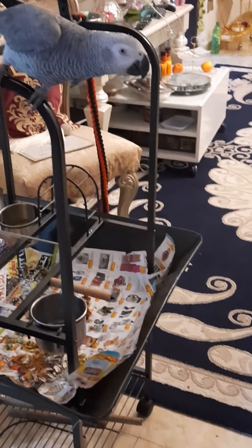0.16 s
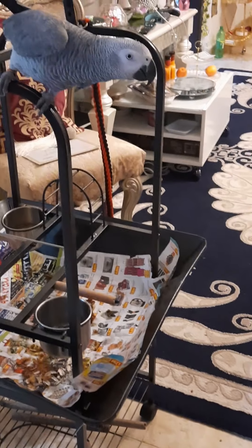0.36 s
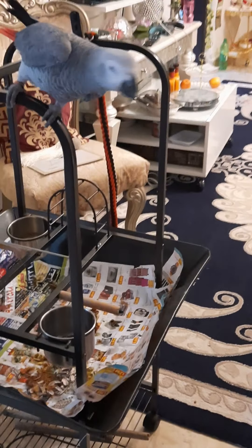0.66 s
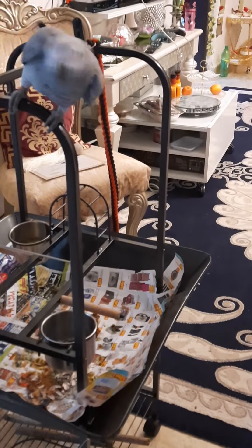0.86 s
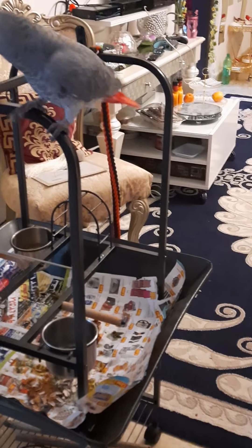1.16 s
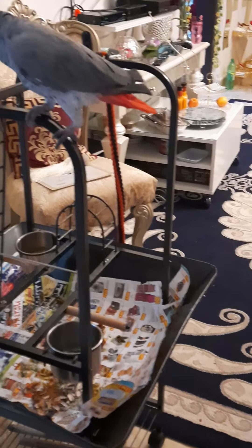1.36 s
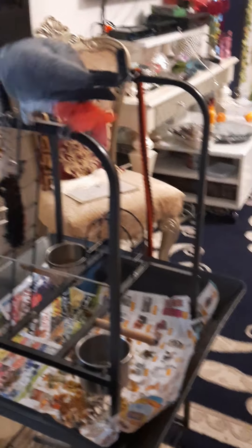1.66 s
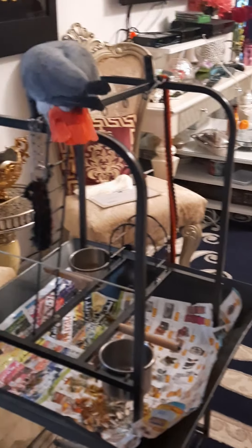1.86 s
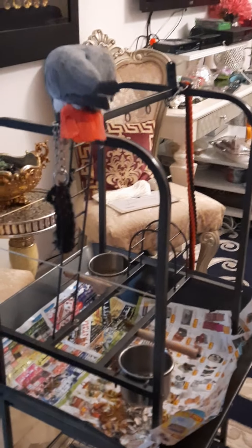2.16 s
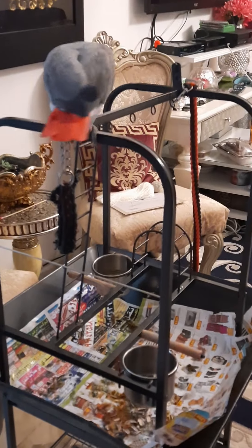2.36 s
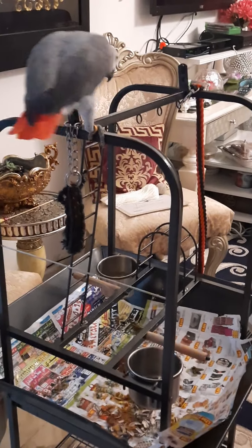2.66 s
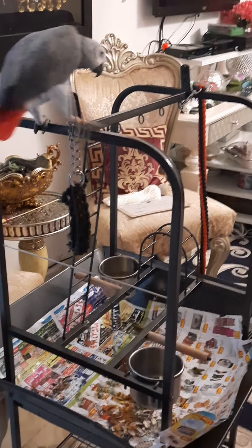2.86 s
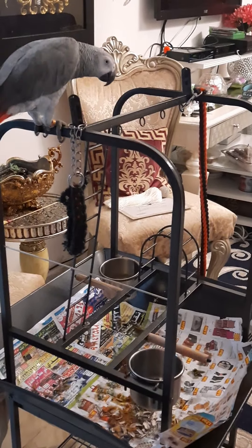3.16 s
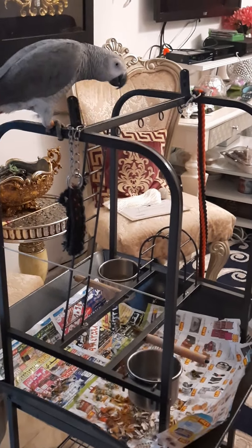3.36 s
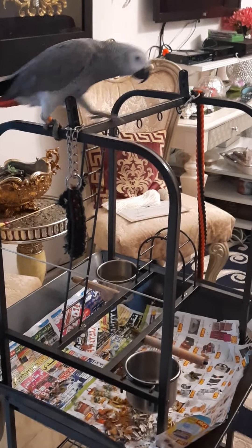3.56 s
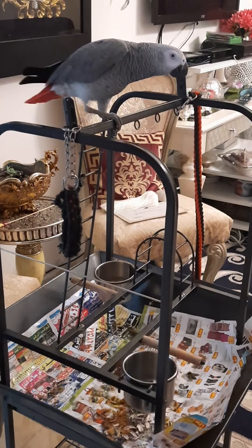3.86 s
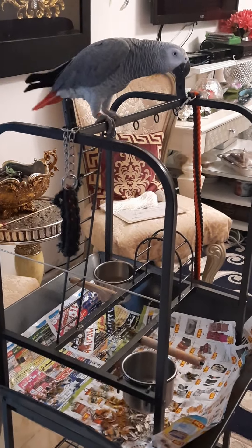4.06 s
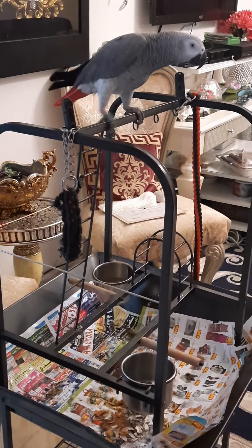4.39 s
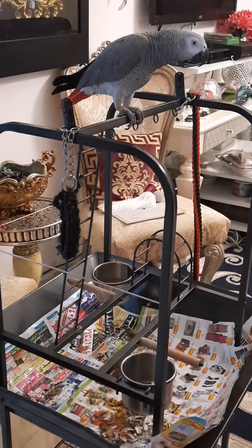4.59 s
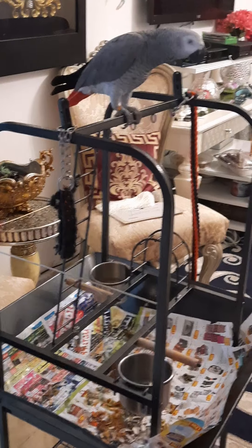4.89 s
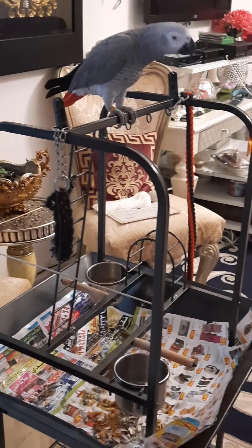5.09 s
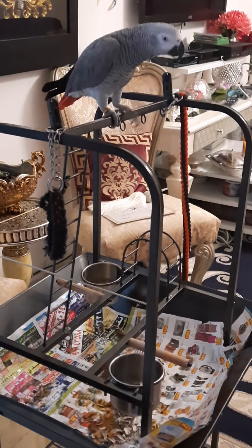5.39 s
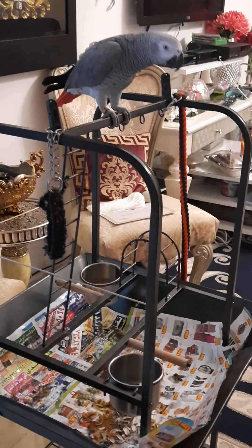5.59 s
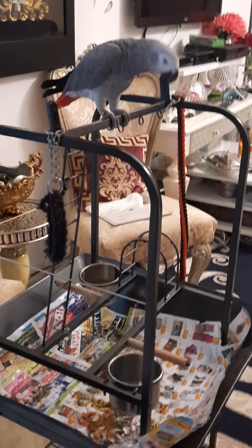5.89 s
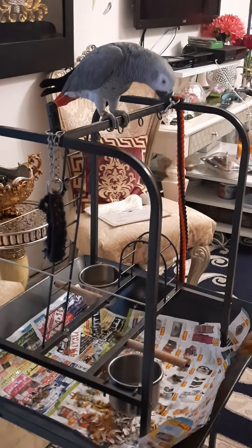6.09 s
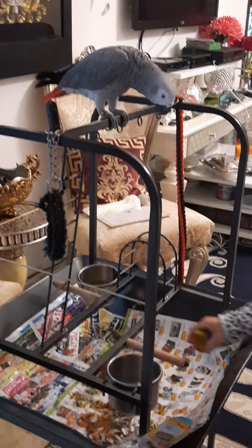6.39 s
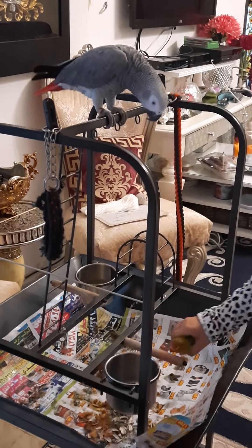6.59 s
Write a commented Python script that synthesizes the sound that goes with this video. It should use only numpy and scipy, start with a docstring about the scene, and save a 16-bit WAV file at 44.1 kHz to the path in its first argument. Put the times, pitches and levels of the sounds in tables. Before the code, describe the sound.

A quiet living room with a low, gently uneven house rumble, a very faint appliance hum and thin hiss, in stereo. Soft beak pops at about 0.4 and 0.5 s. At 0.66 s a tiny bright snap, then a clear parrot chirp to 0.81 s: a quick swoop up, a dip, then a held high whistle, raspy at first, brightening as the beak opens, with short room echo. From 1.3 s come sparse pops and light claw ticks on metal, denser from 1.65 to 2.9 s. Short foot scuffs at 2.13 and 2.93 s faintly ring the frame. At 3.38-3.45 s a much softer, brief, trilled two-voiced chirp, more roomy, with a feather rustle. A bright scuff at 3.78 s, then scattered faint clicks, ticks, tiny creaks and feather brushes until two small ticks near 6.6 s.

```python
"""Parrot on a metal play stand

A grey parrot turns round on its stand in a quiet living room. Two chirps are gliding tones with overtones
and rasp; beak pops are clicks with a sliding ring. Claw ticks are resonant noise bursts, and feet and
feathers are grainy strokes of noise; steps ring the frame as decaying sines, among tiny random creaks.
The room answers with sparse echoes, over rumble and hiss of shaped noise and a faint hum of wavering sines."""
import sys
import numpy as np
from scipy import signal
from scipy.fft import rfft, irfft, next_fast_len
from scipy.io import wavfile
from scipy.ndimage import uniform_filter1d

SR = 44100
rng = np.random.default_rng(int(sys.argv[2]) if len(sys.argv) > 2 else 0)


def unload_audio(sound):
    """Save the sound as a 16-bit wav file, at the path given as the first command line argument."""
    columns = np.transpose(np.atleast_2d(sound))
    # keep every value between -1 and 1, then stretch to whole-number steps
    steps = np.round(np.clip(columns, -1, 1) * 32767)
    wavfile.write(sys.argv[1], SR, steps.astype(np.int16))


N = 297234  # length in samples
EDGE_HZ = 15950  # upper edge of the sound's band


def amp(db):
    """Decibels to gain."""
    return 10 ** (np.asarray(db) / 20)


def unit(x):
    """Scales to unit power."""
    return x / np.sqrt(np.mean(x ** 2) + 1e-20)


def read(points, hz):
    """Reads a curve as straight lines on a log-frequency axis."""
    f, value = np.transpose(points)
    return np.interp(np.log(hz + 1), np.log(f + 1), value)


def add(mix, s, sound):
    """Mixes a sound in at time s."""
    part = mix[max(round(s * SR), 0):][:len(sound)]
    part += sound[:len(part)]


def bins(size):
    """The frequencies of a spectrum of this many samples."""
    return np.fft.rfftfreq(size, 1 / SR)


def noise(colour, size):
    """Noise of unit power with a spectrum given as (f/Hz, level/dB)."""
    spectrum = rfft(rng.standard_normal(size))
    return unit(irfft(spectrum * amp(read(colour, bins(size))), size))


def drift(rate_hz, size):
    """Smooth random movement of unit power, mostly slower than the given rate."""
    span = next_fast_len(size + 4096)
    lowpass = np.exp(-(bins(span) / rate_hz) ** 2)
    return unit(irfft(rfft(rng.standard_normal(span)) * lowpass, span))[:size]


# first chirp, a quick swoop that settles on a held note: [t/s, f/Hz, level/dB]
SWOOP_NOTE = [(.670, 1407, -45), (.675, 1412, -27), (.679, 1560, -44), (.682, 2332, -37),
              (.694, 2983, -35.5), (.701, 2177, -22), (.709, 2157, -28), (.717, 2700, -37.5),
              (.750, 2683, -29), (.790, 2671, -29.5), (.810, 2710, -51)]
# second chirp, the low voice of the syrinx, which trills: [t/s, f/Hz, level/dB]
WARBLE_LOW_VOICE = [(3.378, 2140, -62), (3.390, 2272, -46.5), (3.403, 2203, -52.5), (3.414, 2230, -38),
                    (3.427, 2195, -54), (3.435, 2140, -55)]
# second chirp, the high voice, which leaps above the low one and slides down: [t/s, f/Hz, level/dB]
WARBLE_HIGH_VOICE = [(3.382, 2840, -63), (3.415, 2648, -50.5), (3.423, 3194, -45), (3.442, 2824, -42),
                     (3.453, 2780, -51)]
# what the windpipe and beak let through of the overtones: [f/Hz, level/dB]
THROAT_FILTER = [(1300, 1), (3100, -0.5), (4000, -26), (5200, -31.5), (6100, -8), (8400, -11.5),
                 (9500, -20.5), (10800, -21), (12200, -38.5), (13800, -17), (15800, -26)]
# colour of the rasp of the open beak: [f/Hz, level/dB]
RASP_COLOUR = [(1050, -23), (1400, 2.5), (1850, -3), (2500, -2), (3200, -2.5), (3620, 9), (4150, -3),
               (4700, -8.5), (6300, -4), (9000, -11), (15000, -13.5)]
WAVER, WAVER_HZ = 0.0045, 70  # even a held note wavers by this share of its pitch (rms), this fast


def chirp(rows, jitter, settle_s, overtones_db, shut_db, open_after_s, open_for_s,
          rasp_db=None, trill_hz=0, trill_depth=0):
    """The syrinx sings a tone that starts rough and clears; overtones swell as the beak opens."""
    s, *columns = np.transpose(rows)
    t = np.arange(0, s[-1] - s[0], 1 / SR)
    size = len(t)
    hz, level_db = (uniform_filter1d(np.interp(s[0] + t, s, c), size=80) for c in columns)
    unsettled = np.exp(-t / settle_s)
    opening = np.exp(-((t - open_after_s) / open_for_s) ** 2)

    trill = 1 - trill_depth * np.cos(2 * np.pi * trill_hz * t)
    hz = hz * trill * (1 + jitter * unsettled * drift(450, size))
    phase = 2 * np.pi * np.cumsum(hz * (1 + WAVER * drift(WAVER_HZ, size))) / SR

    overtones = np.zeros(size)
    for k in range(2, 9):
        in_band = k * hz < EDGE_HZ
        overtones += amp(read(THROAT_FILTER, k * hz)) * in_band * np.sin(k * phase)
    beak_gain = amp(overtones_db + shut_db * (1 - opening))
    tone = np.sqrt(2) * amp(level_db) * (np.sin(phase) + beak_gain * overtones)

    voice = tone * signal.windows.tukey(size, .02)
    if rasp_db is not None:
        voice += amp(rasp_db) * noise(RASP_COLOUR, size) * unsettled * signal.windows.tukey(size, .1)
    out = np.zeros(N)
    add(out, s[0], voice)
    return out


def beak_snap(s, level_db):
    """The parting beak gives a tiny bright snap: 4 ms of coloured noise."""
    out, size = np.zeros(N), round(.004 * SR)
    colour = [(2500, -27.0), (4200, 2.5), (5600, -2), (7500, -23), (10200, 6.5), (12500, -18), (15000, -7.0)]
    add(out, s, amp(level_db) * noise(colour, size) * signal.windows.tukey(size, .5))
    return out


# soft pops of beak and tongue: [t/s, level/dB, f/Hz, T60/s]
BEAK_POPS = [(.3651, -59, 1430, .05), (.5053, -65, 1547, .023), (.5341, -65.5, 2130, .03),
             (1.3034, -64.5, 2120, 0.034), (1.471, -65, 1520, 0.018), (1.6506, -57.5, 3494, .045),
             (1.7504, -62.5, 3520, 0.056), (1.9245, -63, 3420, 0.031), (2.2618, -55, 2256, .027),
             (2.6206, -61.5, 3475, .016), (2.8706, -61, 3398, 0.035), (3.041, -65.5, 3397, 0.011),
             (3.8442, -67.5, 1427, 0.02), (3.9814, -64.5, 2397, 0.03), (4.2548, -73, 2660, 0.054),
             (4.3266, -65, 4030, .045), (4.4094, -70, 2080, 0.053), (4.5171, -65, 4280, 0.018),
             (4.5543, -60.5, 2144, 0.012), (4.7896, -59, 1473, .016), (4.9275, -67.5, 2956, 0.056),
             (5.0893, -70, 1605, 0.019), (5.1372, -60, 1702, .025), (5.464, -65.5, 2560, 0.028),
             (5.6096, -69.5, 1739, .012), (5.6775, -73, 1470, 0.023), (5.988, -77, 1584, .015),
             (6.1521, -68.5, 1670, .012)]
CLICK_DB, CLICK_GROWTH = -74.5, .4  # the tongue's click in a pop of -60 dB, and its dB per dB of pop
POP_RISE_S = .002  # time constant of the onset in the hollow of the beak
FAINT_POP_T60_S = .012  # the weakest pops hardly ring


def pops(rows, sag, upper_db, upper_ratio, rough):
    """The tongue clicks and rings the hollow of the beak, whose pitch slides as it opens."""
    out, t = np.zeros(N), np.arange(4096) / SR
    click_colour = [(700, -15), (1800, -4), (3000, -8), (4500, -1.5), (6000, -9.0), (12000, -17.5)]
    for s, db, hz, t60 in rows:
        fade = amp(-60 * t / t60)
        slide = 1 + sag * rng.uniform(-0.62, 1) * np.exp(-t / .005)
        phase = 2 * np.pi * np.cumsum(hz * slide) / SR
        upper = np.sin(upper_ratio * rng.uniform(1.0, 1.1) * phase)
        cavity = np.sin(phase) + amp(upper_db) * fade * upper  # the upper mode dies twice as fast
        onset = (1 - np.exp(-t / POP_RISE_S)) ** 2
        ring = cavity * (1 + rough * drift(400, len(t))) * fade * onset
        ring *= np.sqrt(.004 / np.sum(ring ** 2 / SR))  # the energy of 4 ms at unit power
        click = noise(click_colour, len(t)) * np.exp(-t / .012)
        click_db = CLICK_DB + CLICK_GROWTH * (db + 60)
        add(out, s - .002, amp(db) * ring + amp(click_db) * click)
    return out


# claw ticks on the bars: [t/s, level/dB, resonance f/Hz, brightness/dB]
CLAW_TICKS = [(1.3058, -64.5, 7520, -1), (1.3867, -65, 7620, 2), (1.6846, -54, 9100, -2.5),
              (1.7912, -53, 5390, 2), (1.9999, -56.5, 11550, 3.5), (2.3795, -56.5, 13660, 6.5),
              (2.4563, -56.5, 8100, 0.5), (2.531, -51, 7360, -8), (2.6517, -57, 13930, -2.5),
              (2.7664, -53, 8120, 3.5), (3.1789, -62, 8570, 10), (3.6711, -55, 8030, 2),
              (4.369, -61, 7600, 7), (4.4607, -54, 13500, 15), (4.5134, -64.5, 11460, -1),
              (4.5994, -65.5, 7820, 2), (4.7486, -60, 8460, 13), (4.9881, -62.5, 14100, 5.5),
              (5.4206, -61.5, 6800, -0.5), (5.462, -64, 7800, -5), (5.6136, -65, 7840, 4),
              (5.6477, -65.5, 7560, 2), (6.574, -65, 7030, 5), (6.6458, -60.5, 10700, 6)]
# resonance, mids and top against the level at 7 kHz; brightness then lowers the mids and lifts the top
TICK_RING_DB, TICK_BODY_DB, TICK_TOP_DB = 10, -9.5, -2
TICK_RISE_S = 0.00092  # time constant of the claw's bite on the bar


def ticks(rows, width_hz, fade_s):
    """A claw meets a steel bar: a short burst with one resonance; a sharper touch is brighter."""
    out, t, f = np.zeros(N), np.arange(2048) / SR, bins(2048)
    envelope = np.exp(-t / fade_s) * (1 - np.exp(-t / TICK_RISE_S))
    for s, db, hz, bright_db in rows:
        body_db = TICK_BODY_DB - bright_db
        top_db = TICK_TOP_DB + bright_db
        colour = amp(read([(900, body_db - 16.0), (3200, body_db), (7000, 0), (13500, top_db)], f))
        colour = colour * (1 + amp(TICK_RING_DB) / (1 + ((f - hz) / width_hz) ** 2))
        burst = unit(irfft(rfft(rng.standard_normal(len(t))) * colour))
        add(out, s - .001, amp(db) * burst * envelope)
    return out


# feet sliding and gripping: [t/s, level/dB, length/s, dullness/dB]
FOOT_SCUFFS = [(2.122, -45, 0.015, -6.5), (2.135, -43, 0.012, 4), (2.146, -62, 0.044, 20),
               (2.918, -55, 0.011, 13), (2.953, -58, 0.0136, 22), (3.772, -55.5, 0.017, -20),
               (3.795, -55.5, 0.032, -24)]
# colour of foot on bar before dullness: [f/Hz, level/dB]
FOOT_COLOUR = [(530, -28), (900, -17), (1640, -20), (2650, -6), (2950, -11), (3250, -8.5), (3980, -8),
               (5440, -6), (7250, -2), (8570, 3.5), (9550, -5.5), (11600, -2.5), (13200, -5), (14700, -11),
               (15800, -0.5)]
# feathers brushing as the bird moves: [t/s, level/dB, length/s, dullness/dB]
FEATHER_RUFFLES = [(.09, -70, 0.1, -12.5), (.70, -58, 0.089, 5.5), (1.13, -71, 0.0915, 3),
                   (3.44, -60, .06, 3), (4.55, -72.5, 0.051, -0.5), (5.08, -71, .12, -5.5),
                   (5.6, -79.5, 0.12, 7), (5.98, -79.5, .06, 0), (6.13, -74, .12, 8)]
# colour of feather on feather before dullness: [f/Hz, level/dB]
FEATHER_COLOUR = [(150, -3), (480, -0.5), (650, -2.5), (900, -16.5), (2000, -7), (3200, -24.5), (4600, -17),
                  (6000, -24.5), (15000, -29.5)]


def rubs(rows, colour, grain_db, taper):
    """Strokes of friction catch and slip unevenly; a duller stroke has more body below 3 kHz."""
    out = np.zeros(N)
    for s, db, length, dull_db in rows:
        size = round(length * SR)
        dulled = [(hz, level + dull_db / (1 + (hz / 3000) ** 2)) for hz, level in colour]
        stroke = noise(dulled, size)
        grain = unit(amp(grain_db * drift(400, size)))
        add(out, s, amp(db) * stroke * grain * signal.windows.tukey(size, taper))
    return out


# the bird's weight landing on a bar: [t/s, level/dB]
BAR_STEPS = [(.74, -67.5), (2.125, -59.5), (2.928, -69.5), (3.46, -59), (3.79, -57.5)]
# modes of the stand's steel frame: [f/Hz, level/dB, T60/s]
FRAME_MODES = [(99, 1.5, .35), (152, -5, 0.34), (255, -6, .5), (308.8, 0, .6), (342, -2, 0.32),
               (616, -14.5, .3)]


def frame():
    """Each step sets the tubes of the stand humming softly, as a sum of decaying modes."""
    out, t = np.zeros(N), np.arange(SR) / SR
    for s, db in BAR_STEPS:
        ring = np.zeros(SR)
        for hz, level, t60 in FRAME_MODES:
            ring += amp(level - 60 * t / t60) * np.sin(2 * np.pi * (hz * t + rng.random()))
        add(out, s, amp(db) * ring * (1 - np.exp(-t / .01)))
    return out


def fidget(level_db, per_s, spread_db):
    """Tiny creaks of feather and foot, too faint to pick out: short decaying sines at random."""
    out, t = np.zeros(N), np.arange(512) / SR
    for when, pitch, size in rng.random((round(per_s * N / SR), 3)):
        grain = np.sin(2 * np.pi * 1500 * 7 ** pitch * t) * np.exp(-t / 0.00061)
        add(out, when * N / SR, amp(level_db + spread_db * size) * grain)
    return out


def faint(count, level_db, low_hz, high_hz):
    """Weak events spread loosely over the scene: rows [t/s, level/dB, f/Hz]."""
    when, size, pitch = rng.random((count, 3)).T
    s = (np.arange(count) + when) / count * N / SR
    return list(zip(s, level_db - 5 * size, low_hz * (high_hz / low_hz) ** pitch))


# decay of the room: [f/Hz, T60/s]
ROOM_DECAY = [(250, .5), (1400, .48), (2700, 0.38), (5500, .33), (8000, 0.24), (15000, .22)]
# first wall reflections: [delay t/s, share of the tail's strength]
WALL_ECHOES = [(.0052, .3), (.0087, .3), (0.0143, .25), (0.02, .2)]


def room_response():
    """Per microphone: a few wall reflections, and sparse taps whose treble dies first."""
    taps, step = np.zeros((2, SR)), 15
    at = np.arange(round(.006 * SR), SR - step, step)
    at = at + rng.integers(0, step, (2, len(at)))
    np.put_along_axis(taps, at, rng.choice([-1., 1.], at.shape), 1)
    hz, t, z = signal.stft(taps, SR, nperseg=256)
    decay = amp(-60 * t / read(ROOM_DECAY, hz)[:, None])
    tail = signal.istft(z * decay, SR, nperseg=256)[1]
    tail /= np.linalg.norm(tail[0])
    for delay, share in WALL_ECHOES:
        for side in tail:
            add(side, delay + rng.uniform(0, .0008), np.array([share]))
    return tail


def place(x, room, wet_db, lean_db, lag_ms):
    """The direct sound reaches the left microphone first; the room answers on both."""
    delay = np.sinc(np.arange(-20, 21) - lag_ms * SR / 1000) * np.hanning(41)  # fractional-sample delay
    late = np.convolve(x, delay, "same")
    wet = signal.oaconvolve(x[None], room[:, :SR // 2], axes=1)[:, :N]
    wet *= np.std(x) / np.std(wet, axis=1, keepdims=True)  # as strong as the direct sound
    return (np.array([x, late]) + amp(wet_db) * wet) * amp([[lean_db / 2], [-lean_db / 2]])


# colour of the low rumble of the house: [f/Hz, level/dB]
RUMBLE_COLOUR = [(21, -32), (36, 0), (65, -3.5), (103, -6), (129, -12), (231, -21), (311, -14),
                 (375, -23.5), (447, -26), (472, -27.5), (511, -25), (532, -41), (554, -22), (601, -32),
                 (900, -43.5), (1170, -69.5), (1980, -120)]
# colour of the thin hiss: [f/Hz, level/dB]
HISS_COLOUR = [(470, -31), (800, -2), (1110, -1.5), (2230, -4), (3280, -10), (4310, -8.5), (5330, -13),
               (8260, -5), (9350, -12.5), (13800, -8), (15800, -13)]
RUMBLE_DB, HISS_DB = -58, -78
# partials of the appliance hum: [f/Hz, level/dB]
HUM_PARTIALS = [(312.2, -76.5), (441.4, -78.5), (500.6, -85), (570.6, -83), (651.4, -92.5)]
# how alike the noise is on both sides: [f/Hz, left-right coherence, below 0 counts as 0]
SIDE_LIKENESS = [(60, 0.83), (130, 1), (290, 0.636), (640, 0.55), (1410, -0.5), (3100, -0.2), (6820, -0.5),
                 (15000, -0.0)]
# balance of the background: [f/Hz, left-right level/dB]
SIDE_LEAN = [(60, -4), (110, -4.5), (200, -4), (380, -8), (700, -3.5), (1290, 0), (2380, -0.5),
             (4400, -0.5), (8120, 0), (15000, 4)]


def background(swell_db, swell_hz, low_cut_hz, waver_hz):
    """House rumble with swelling bass, a wavering hum and a thin hiss; the lows lean to the right."""
    f, t = bins(N), np.arange(N) / SR
    swell = unit(amp(swell_db * drift(swell_hz, N)))
    deep = 1 / (1 + (f / 150) ** 4)  # only the bass swells

    def bed():
        """Spectrum of one independent layer of rumble and hiss."""
        rumble = amp(RUMBLE_DB) * noise(RUMBLE_COLOUR, N)
        hiss = amp(HISS_DB) * noise(HISS_COLOUR, N)
        return rfft(rumble * swell) * deep + rfft(rumble) * (1 - deep) + rfft(hiss)

    a, b = bed(), bed()
    hum = np.zeros(N)
    for hz, db in HUM_PARTIALS:
        waver = waver_hz * np.cumsum(drift(6, N)) / SR
        hum += amp(db) * np.sin(2 * np.pi * (hz * t + waver))

    same = np.clip(read(SIDE_LIKENESS, f), 0, 1)
    lean = amp(read(SIDE_LEAN, f) / 2)
    pair = np.array([a, same * a + np.sqrt(1 - same ** 2) * b]) + rfft(hum)
    low_cut = 1 / np.sqrt(1 + (low_cut_hz / (f + 1)) ** 16)  # the microphones lose the deepest bass
    return irfft(pair * low_cut * np.array([lean, 1 / lean]), N)


# the microphones' own colour, on the bird's sounds: [f/Hz, left-right level/dB]
MICROPHONE_COLOUR = [(700, -6), (1400, -1.5), (2700, -1), (8000, -1.5), (11000, 8), (14000, 2.5)]


def scene():
    """The bird's sounds, each placed in the room, over the room's own background."""
    room = room_response()
    swoop = chirp(SWOOP_NOTE, jitter=0.018, settle_s=.055, overtones_db=2, shut_db=-11.5,
                  open_after_s=0.077, open_for_s=.036, rasp_db=-38)
    low_voice = chirp(WARBLE_LOW_VOICE, jitter=0.031, settle_s=0.16, overtones_db=-1, shut_db=-10,
                      open_after_s=0.035, open_for_s=.011, trill_hz=38.7, trill_depth=.1)
    high_voice = chirp(WARBLE_HIGH_VOICE, jitter=0.027, settle_s=0.15, overtones_db=5.5, shut_db=-12,
                       open_after_s=0.069, open_for_s=0.021)
    snap = beak_snap(.658, level_db=-45.5)  # just before the first chirp

    weak_pops = faint(count=12, level_db=-72.5, low_hz=1500, high_hz=4300)
    faint_pops = [(*row, FAINT_POP_T60_S) for row in weak_pops]
    weak_ticks = faint(count=12, level_db=-71.5, low_hz=6830, high_hz=9000)
    faint_ticks = [(*row, 0) for row in weak_ticks]  # neutral brightness

    beak = pops(BEAK_POPS + faint_pops, sag=0.1, upper_db=-5.5, upper_ratio=1.4, rough=0.9)
    claws = ticks(CLAW_TICKS + faint_ticks, width_hz=233, fade_s=0.0051)
    feet = rubs(FOOT_SCUFFS, FOOT_COLOUR, grain_db=2, taper=.3)
    feathers = rubs(FEATHER_RUFFLES, FEATHER_COLOUR, grain_db=5.5, taper=0.65)
    creaks = fidget(level_db=-83.5, per_s=14, spread_db=11.0)

    bird = place(swoop + snap, room, wet_db=-1.5, lean_db=-1, lag_ms=0.13)
    bird += place(low_voice + high_voice, room, wet_db=6, lean_db=1.5, lag_ms=0.099)
    bird += place(beak, room, wet_db=2, lean_db=1.0, lag_ms=0.066)
    bird += place(claws, room, wet_db=6.0, lean_db=0.5, lag_ms=.02)
    bird += place(feet, room, wet_db=6.0, lean_db=0.0, lag_ms=0.024)
    bird += place(feathers, room, wet_db=0.5, lean_db=1.0, lag_ms=0.033)
    bird += place(frame(), room, wet_db=-7, lean_db=-3.0, lag_ms=0.1003)
    bird += place(creaks, room, wet_db=-2.0, lean_db=6, lag_ms=0.087)

    colour = amp(read(MICROPHONE_COLOUR, bins(N)) * np.array([[.5], [-.5]]))
    bed = background(swell_db=1.25, swell_hz=13, low_cut_hz=43.3, waver_hz=2.583)
    return irfft(rfft(bird) * colour, N) + bed


def record(dry):
    """The recorder's band limit: a steep low-pass at the band edge."""
    lowpass = signal.firwin(511, EDGE_HZ, window=("kaiser", 9), fs=SR)
    return signal.oaconvolve(dry, lowpass[None], "same", axes=1)


dry = scene()
out = record(dry)
unload_audio(out)
```